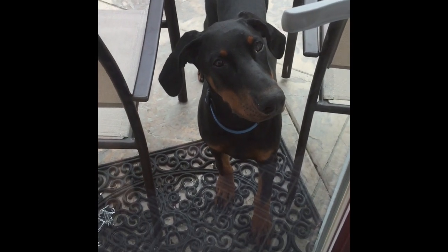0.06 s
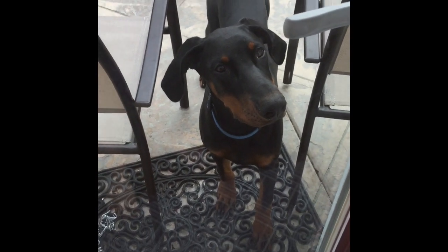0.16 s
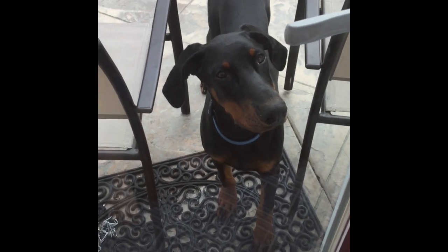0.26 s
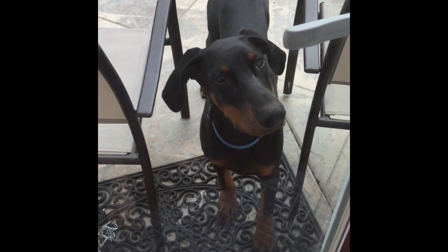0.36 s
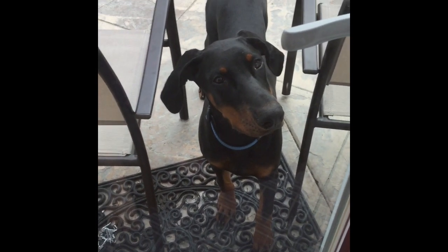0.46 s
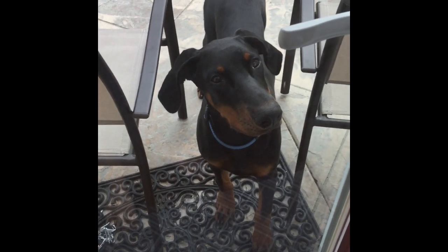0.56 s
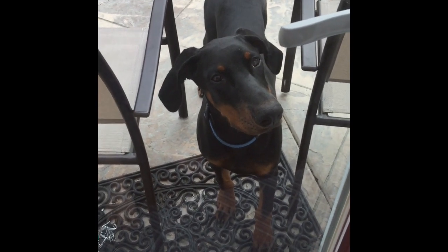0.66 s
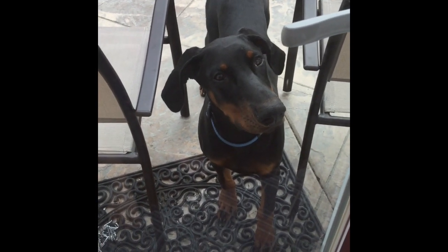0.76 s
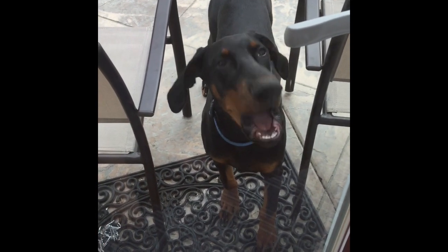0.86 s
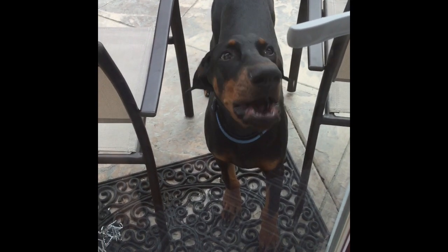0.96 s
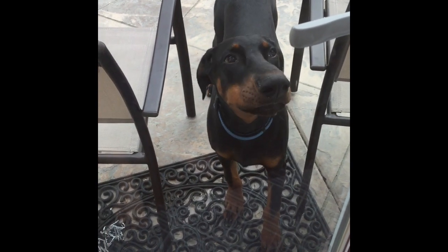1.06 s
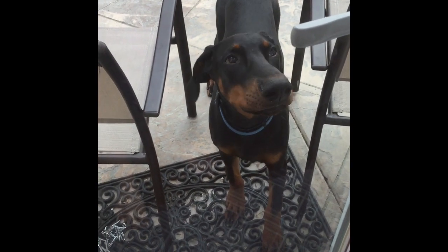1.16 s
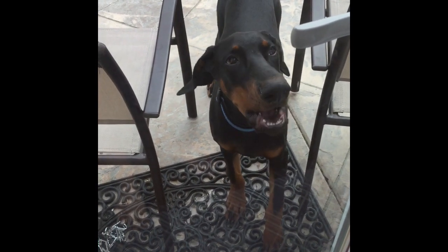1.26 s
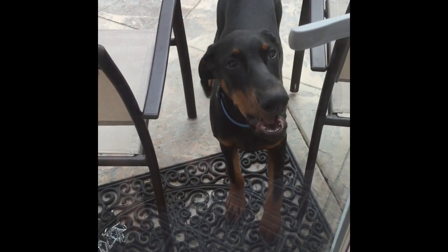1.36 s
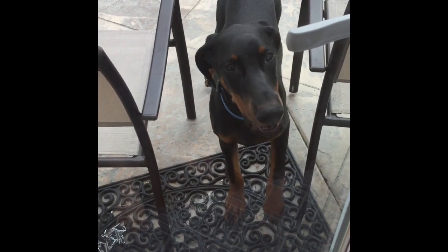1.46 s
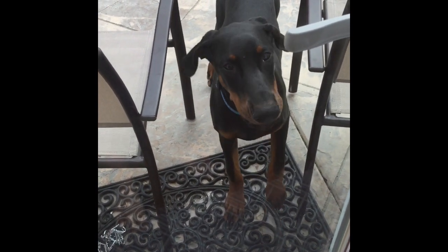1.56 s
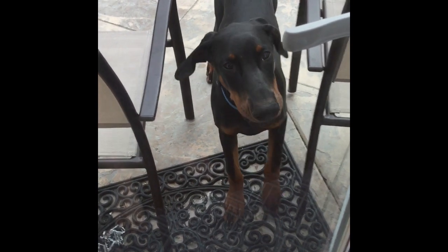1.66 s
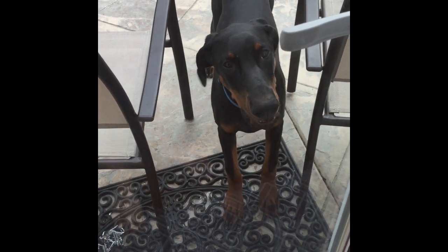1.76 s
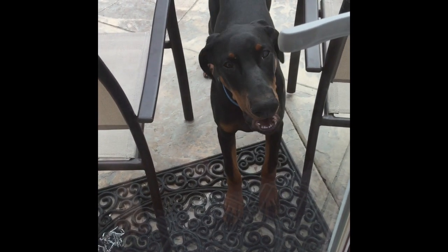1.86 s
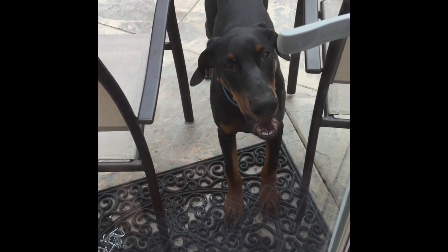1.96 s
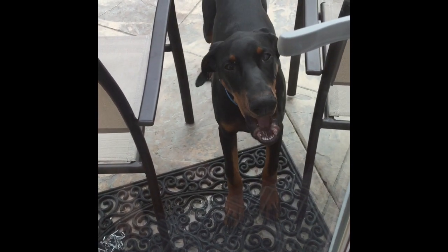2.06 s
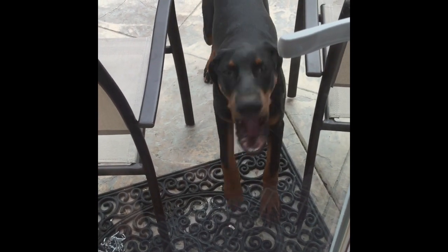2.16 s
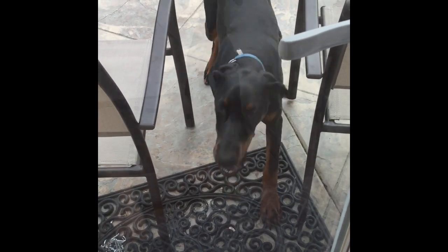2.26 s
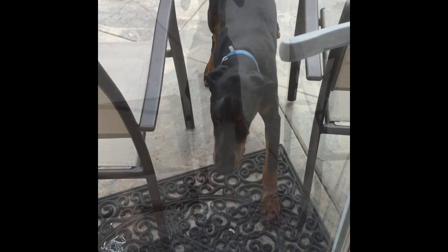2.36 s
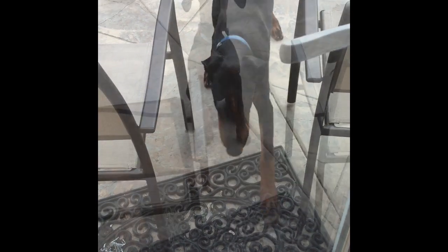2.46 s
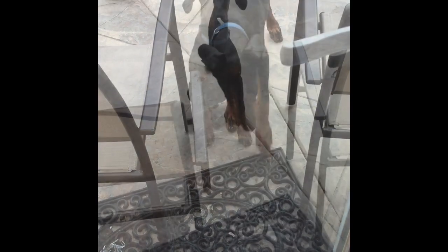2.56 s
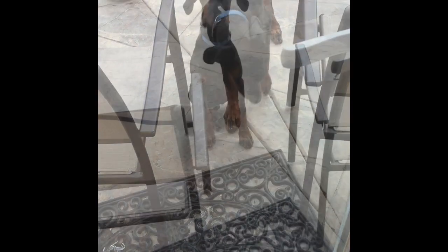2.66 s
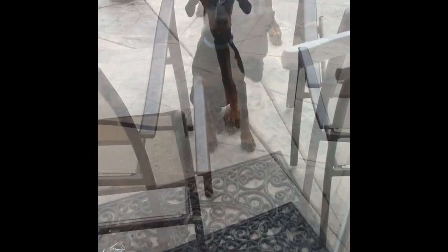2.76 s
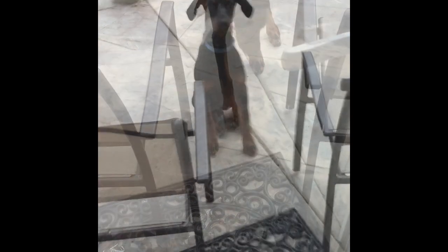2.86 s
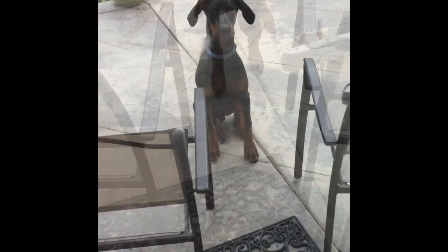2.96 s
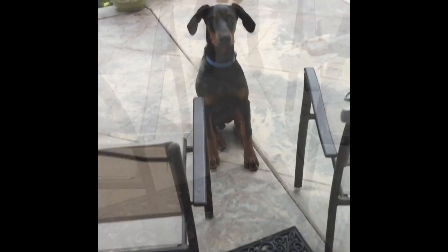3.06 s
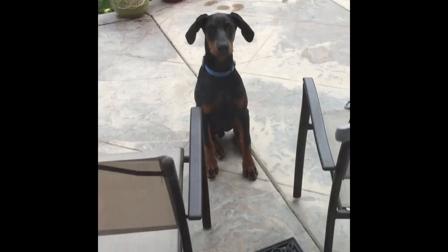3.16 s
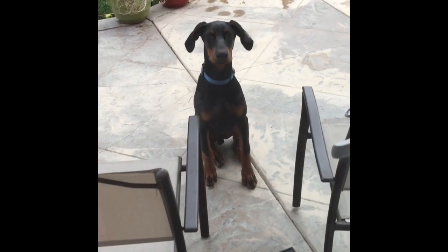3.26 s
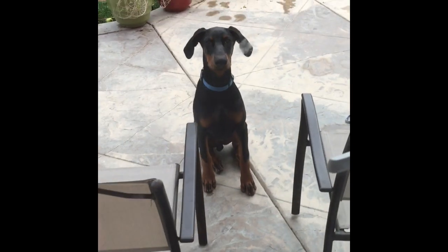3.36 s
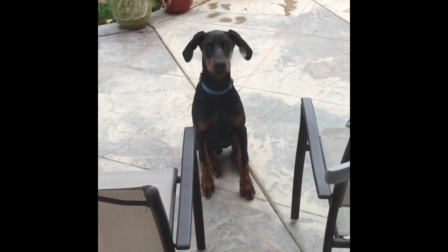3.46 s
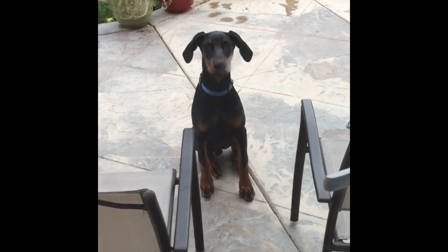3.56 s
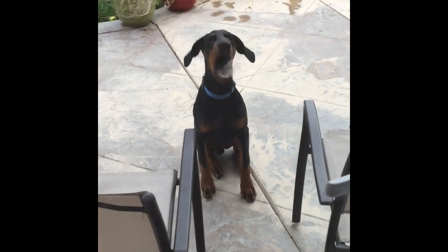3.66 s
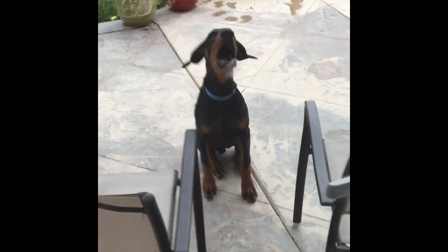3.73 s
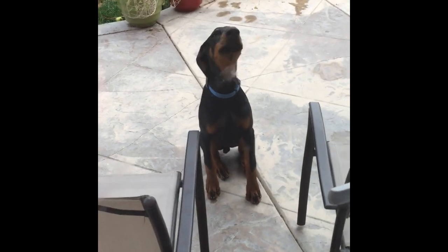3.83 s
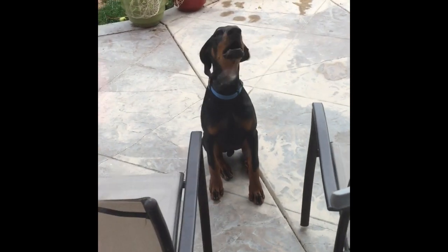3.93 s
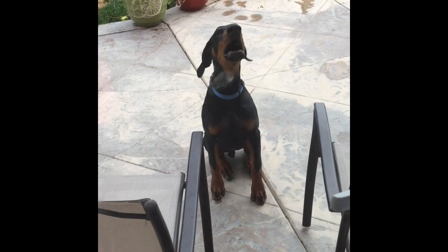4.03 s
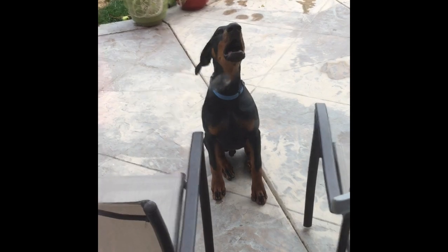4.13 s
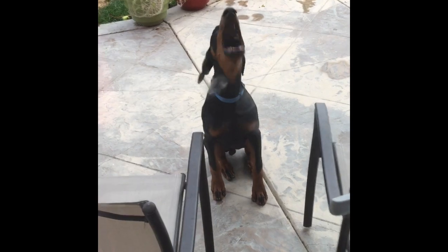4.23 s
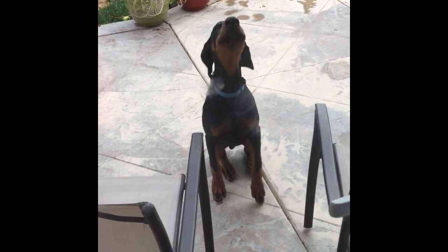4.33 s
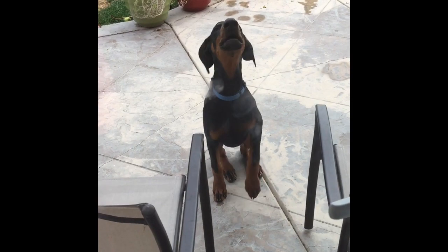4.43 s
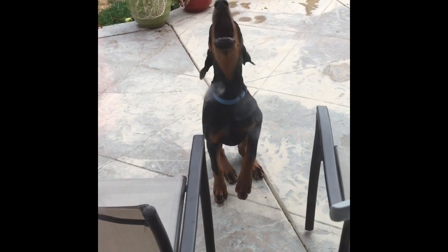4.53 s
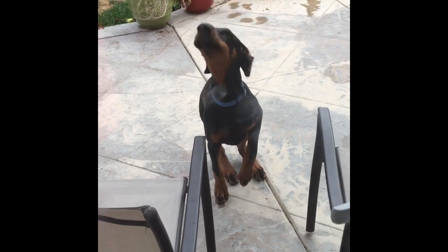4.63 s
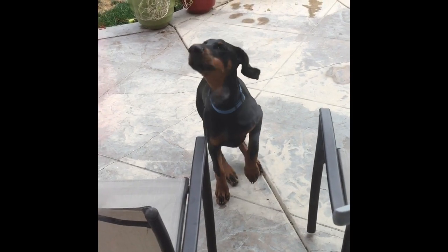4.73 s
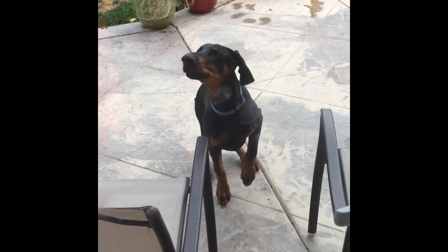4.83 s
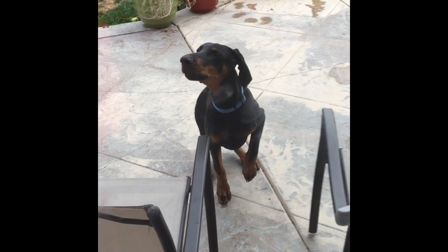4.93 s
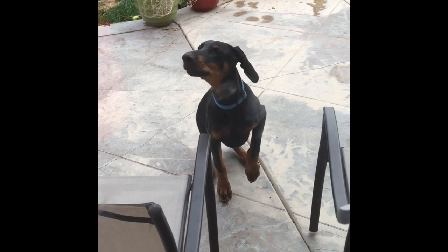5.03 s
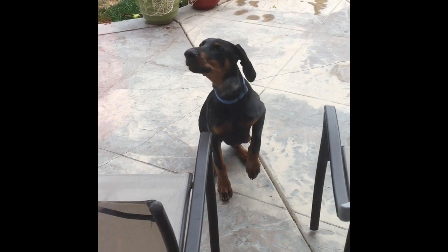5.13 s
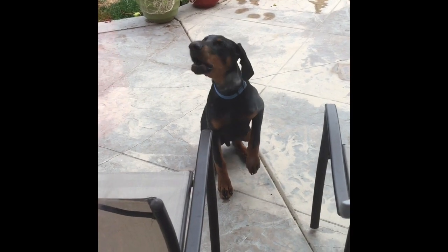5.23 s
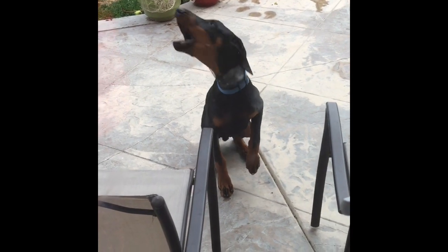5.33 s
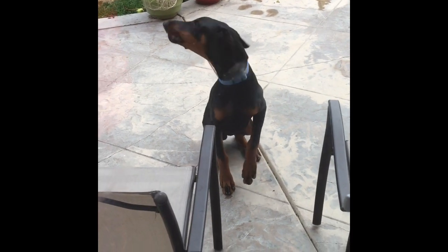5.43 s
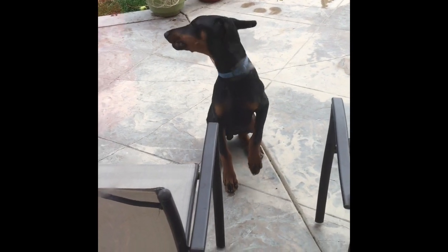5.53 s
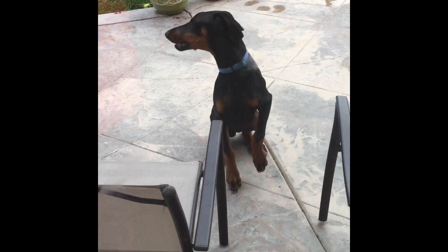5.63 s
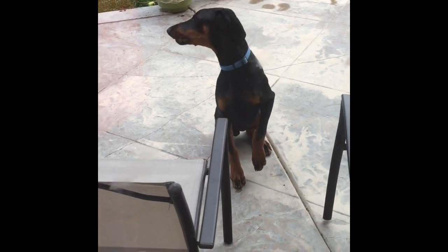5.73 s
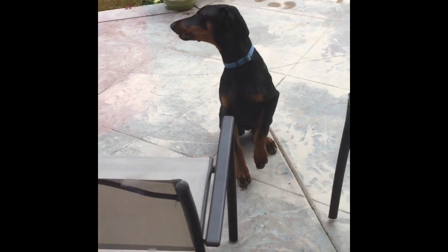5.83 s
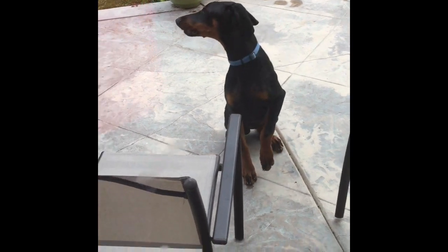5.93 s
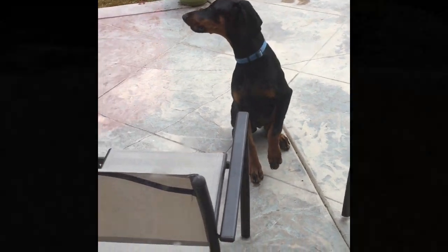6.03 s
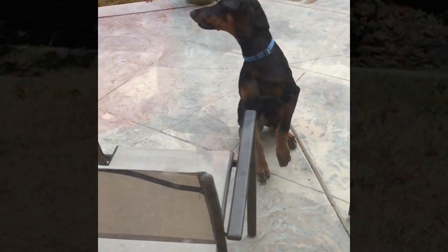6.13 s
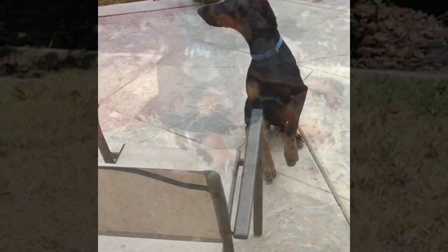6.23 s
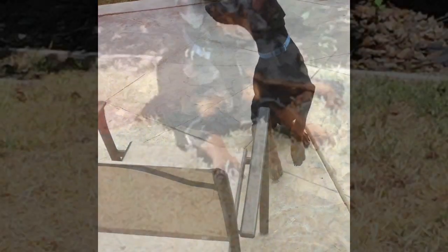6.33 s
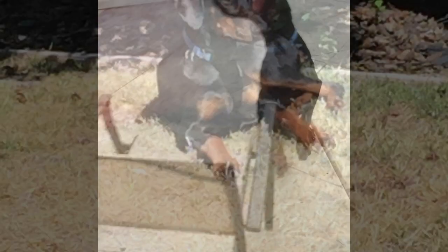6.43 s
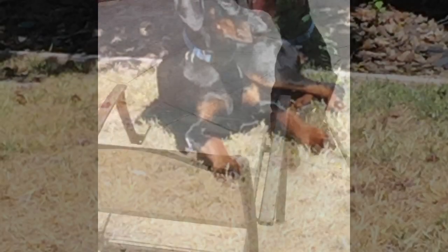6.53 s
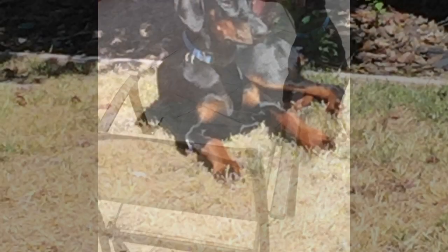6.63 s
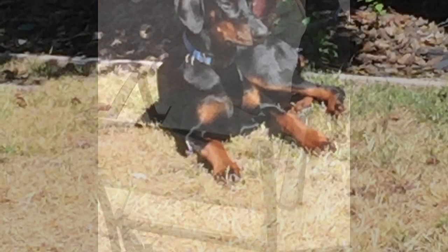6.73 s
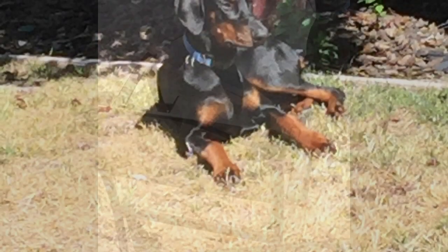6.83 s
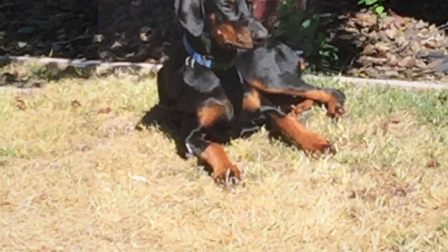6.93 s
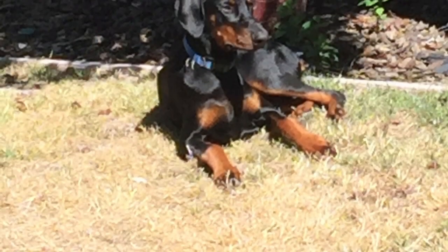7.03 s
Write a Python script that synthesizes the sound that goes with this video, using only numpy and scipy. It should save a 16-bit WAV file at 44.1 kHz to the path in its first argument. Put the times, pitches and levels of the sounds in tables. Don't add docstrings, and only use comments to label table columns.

```python
import sys
import numpy as np
from scipy import signal
from scipy.fft import rfft, irfft, next_fast_len
from scipy.io import wavfile

SR = 44100
rng = np.random.default_rng(int(sys.argv[2]) if len(sys.argv) > 2 else 0)


def attenuation_scalar(level_db):
    decades = np.asarray(level_db, float) / 20
    return 10 ** decades


def log_audio(samples):
    frames = np.atleast_2d(samples).T
    limited = np.clip(frames, -1, 1)
    pcm = np.round(limited * 32767).astype(np.int16)
    wavfile.write(sys.argv[1], SR, pcm)


N = 312699
TIME = np.arange(N) / SR


def rms_one(x):
    return x / np.sqrt(np.mean(x ** 2) + 1e-20)


def columns(rows, t):
    seconds, *rest = np.transpose(rows)
    return [np.interp(t, seconds, column) for column in rest]


def at_hz(points, hz):
    table_hz, values = np.array(points)[:, :2].T
    return np.interp(np.log(hz + 1), np.log(table_hz), values)


def wobble(cut_hz, size):
    low_pass = signal.butter(2, cut_hz, fs=SR, output="sos")
    settled = signal.sosfilt(low_pass, rng.standard_normal(size + 2000))[2000:]
    return rms_one(settled)


def resonate(x, hz, width_hz):
    r = np.exp(-np.pi * width_hz / SR)
    feed = np.array([1, 0, -1]) * (1 - r * r) / 2
    return signal.lfilter(feed, [1, -2 * r * np.cos(2 * np.pi * hz / SR), r * r], x)


def span(rows):
    start = round(rows[0][0] * SR)
    t = np.arange(start, round(rows[-1][0] * SR)) / SR
    fade = np.clip(np.minimum(t - t[0], t[-1] - t) / 0.0015, 0, 1)
    return start, t, fade


def barks():
    # time in seconds, pitch in Hz, level in dB,
    # mouth opening as tilt in dB per octave.
    bark_1 = [
        [(.95, 713, -45, -5.5), (.966, 862.5, -22.5, -13.5), (.982, 811, -19.5, -6.5),
         (1.012, 883.5, -17.5, -1)],
        [(1.012, 1106, -11, -3.5), (1.035, 1075, -17, 0.5), (1.052, 1075, -10, -6), (1.066, 733, -30, -18),
         (1.12, 590, -35.5, -3.5)],
    ]
    bark_2 = [
        [(2.22, 988, -58, -19), (2.231, 986, -20, -17), (2.262, 813, -21, 2.5), (2.277, 836, -18, -5)],
        [(2.275, 1009, -13.5, -4), (2.3, 1035, -6, -11), (2.345, 1044, -19.5, 4.5), (2.37, 657, -25.5, -21.5),
         (2.41, 740, -45, -16.5)],
    ]
    bark_3 = [
        [(3.783, 781, -23.5, -10.5), (3.795, 788.5, -25, 3), (3.815, 824.5, -20, -5), (3.83, 867, -35, -2)],
        [(3.812, 1035, -38, 5), (3.838, 1048, -14, -8.5), (3.86, 1050, -22, 7), (3.882, 957, -20, -1.5),
         (3.9, 926, -45, 4)],
    ]
    bark_4 = [
        [(4.295, 722, -53, 3.5), (4.305, 755.4, -27, -8), (4.325, 669.7, -22, -14), (4.36, 648, -31, -2)],
        [(4.322, 988.4, -22, -14.5), (4.355, 1024, -13.5, -10), (4.385, 1072, -12.5, -6),
         (4.408, 965, -24, -5.5), (4.44, 991.6, -27, -14)],
    ]
    bark_5 = [
        [(4.57, 601.2, -49, -33.5), (4.605, 679, -27, -9.5), (4.628, 727.5, -23.5, -6.5),
         (4.64, 813, -17.5, -4), (4.715, 838, -29.5, -12.5), (4.79, 794.4, -33, -36)],
        [(4.645, 980.6, -28.5, -9), (4.695, 1042, -22.5, -14.5), (4.775, 1028, -34.5, -15.5)],
    ]
    bark_6 = [
        [(5.368, 470.5, -56, -7), (5.385, 527.4, -29.5, -13.5), (5.42, 590.1, -15, -22),
         (5.485, 597.8, -30.5, -7.5)],
        [(5.418, 959, -37, -10.5), (5.445, 941.5, -20.5, -14.5), (5.47, 986.7, -22.5, -2),
         (5.485, 989.3, -19, -11.5), (5.545, 728.6, -41, -11.5)],
    ]
    whimpers = [
        [(.925, 726, -68, -15.5), (.935, 702, -50, -23), (.949, 776, -51, -16.5)],
        [(1.335, 852, -53, -19), (1.36, 910.6, -38.5, -18), (1.395, 928, -50, -15)],
        [(3.748, 878, -49, -14.5), (3.762, 914, -46.5, -24.5), (3.783, 873, -32, -9)],
        [(4.44, 1015, -34, .5), (4.49, 638.4, -42, -30.5), (4.58, 499.3, -42.5, -34.5)],
    ]
    # half-pitch tones in dB at start, middle
    strain = [(-37, -37.5, -41.5, 0.1, .1), (-55, -15, -1.5, .02, .05), (-30, -28, 5, .02, .3),
              (-38, -44, -42, 0.3, 0), (-54, -46.5, -33, 0, 0.12), (-19.5, -11.5, -17.5, 0, 0.41),
              (-62.5, -51, -61, 0.15, 0), (-42, -37, -16, .06, .5), (-24, -31.5, -24, .04, 0.41),
              (-47.5, -12.5, -6, 0, .45), (-26, -1.5, 4, 0.16, 0.27), (6, 18.5, 17, 0.8, 0.51),
              (10.5, -6.5, 12, 0.2, .32), (-3, -2, 8, 0.5, 0.29), (-54.5, -23.5, -9, 0.1, 0.34),
              (-15, -8, 8, .24, .36), ]
    # frequency in Hz, gain in dB.
    throat = [(200, -32), (300, -3), (500, 3), (1000, 11), (1600, 12), (2150, 1.5), (2330, -13),
              (2600, -11.5), (3200, -25), (3500, -35), (3850, -30), (4500, -36), (6300, -34.5),
              (16000, -60)]
    # centre in Hz, width in Hz, gain in dB.
    breath = [(560, 190, -11.5), (1040, 490, -5.5), (1650, 230, 0.5), (2076, 380, -9.5), (2500, 140, -22.5),
              (3020, 300, -27.5), (3850, 350, -28), (4800, 170, -38.5), (6140, 1100, -35), (8600, 740, -47),
              (11600, 890, -45), (14000, 2200, -55.5)]
    voice, hiss = np.zeros(N), np.zeros(N)
    registers = sorted(bark_1 + bark_2 + bark_3 + bark_4 + bark_5 + bark_6 + whimpers)
    k = np.arange(1, 29)[:, None]
    half_weight = (k % 2) * np.where(k == 1, 1.4, np.where(k > 4, 0.7, 1))
    for rows, (*halves_db, fresh, tired) in zip(registers, strain):
        start, t, fade = span(rows)
        hz, level_db, tilt_db = columns(rows, t)
        progress = (t - t[0]) / (t[-1] - t[0])
        half_db = np.interp(progress, [0, 0.5, 1], halves_db)
        rough = np.clip(fresh + (tired - fresh) * progress ** 2, 0, 1)
        slip, shake, air = (wobble(cut_hz, size=12000)[:len(t)] for cut_hz in (110, 200, 15500))
        phase = np.pi * np.cumsum(hz) / SR
        tone_hz = k * hz / 2

        opening_db = tilt_db * np.log2(np.clip(k / 2, 1, 2))
        size = attenuation_scalar(opening_db + half_db * half_weight) * (tone_hz < 15500)
        draws = rng.standard_normal((28, 20))
        flicker = np.array([np.interp(t - t[0], np.arange(20) * 0.022, row) for row in draws])
        size *= attenuation_scalar((tone_hz > 2300) * (0.5 * (level_db + 14.5) + 5.5 * flicker))
        heard = np.sqrt(np.sum((size * attenuation_scalar(at_hz(throat, tone_hz))) ** 2, axis=0) / 2)

        timing_slip = (1.8 * k ** 0.13 * rough + 0.045 * k * (k > 6)) * slip
        tones = np.sum(size * np.sin(k * phase + k * k + timing_slip), axis=0)
        loudness = fade * attenuation_scalar(level_db)
        voice[start:start + len(t)] += loudness * (1 + 1.3 * rough * np.tanh(shake)) * tones / heard
        puffs = air * (1 + 0.34 * np.cos(2 * phase))
        hiss[start:start + len(t)] += loudness * rough ** 1.23 * puffs

    size = next_fast_len(N)
    hz = np.arange(size // 2 + 1) * SR / size
    mouth = sum(attenuation_scalar(db) * np.exp(-((hz - centre) / width) ** 2) for centre, width, db in breath)
    voiced = rfft(voice, size) * attenuation_scalar(at_hz(throat, hz))
    breathed = attenuation_scalar(17.5) * rfft(hiss, size) * mouth
    return irfft(voiced + breathed, size)[:N]


def squeak_rows(s, length, hz, db, second_db):
    shape = ((0, 15.5), (0.17, 0), (1, 9.5))
    return [(s + share * length, hz, db - loss_db, db - loss_db + second_db, -110)
            for share, loss_db in shape]


def whistles():
    # time in seconds, pitch in Hz, level in dB.
    whistle = [
        (1.327, 4720, -70.5),
        (1.383, 4596, -51.5),
        (1.575, 4493, -46.5),
        (1.677, 4430, -48.5),
        (1.767, 4289, -42),
        (1.801, 4320, -53.5),
    ]
    # start in seconds, length in seconds, pitch in Hz,
    # level in dB, second tone against the first in dB.
    squeaks = [(3.3, 0.095, 4556, -67.5, -23.5), (.955, .05, 3850, -62, -13.5),
               (0.976, 0.021, 4870, -53.5, -31), (2.216, 0.038, 3960, -67, 7.5),
               (3.752, .028, 4530, -71.5, -14.5), (3.774, 0.028, 3590, -58.5, -29.5),
               (3.789, 0.023, 3900, -50, -16.5), (4.298, 0.042, 4040, -69, -23.5),
               (5.395, .03, 4080, -69.5, -32.5), (5.415, 0.077, 3800, -57.5, -21)]
    second_db, second_loss_db_per_s, third_db = -14.5, 54.5, -34.5
    out = np.zeros(N)
    speaks_s = whistle[1][0]
    long = [(s, hz, db, db + second_db - second_loss_db_per_s * (s - speaks_s), db + third_db)
            for s, hz, db in whistle]
    for rows in [long] + [squeak_rows(*row) for row in squeaks]:
        start, t, fade = span(rows)
        hz, *levels_db = columns(rows, t)
        phase = 2 * np.pi * np.cumsum(hz) / SR + 0.15 * wobble(80, size=30000)[:len(t)]
        tones = sum(attenuation_scalar(db) * np.sin((k + 1) * phase) for k, db in enumerate(levels_db))
        tremble = attenuation_scalar(0.44 * wobble(40, size=30000)[:len(t)])
        out[start:start + len(t)] += np.sqrt(2) * fade * tones * tremble
    return out


def ticks():
    # time in seconds, thud level in dB, thud pitch in Hz, ring level in dB, ring pitch in Hz.
    paws = [(.234, -42.5, 470, -54, 856), (.26, -52, 480, -58, 900), (.497, -40.5, 470, -52, 1100),
            (0.555, -39, 405, -60, 1230), (.706, -32, 400, -45, 1310), (2.959, -41.5, 470, -46, 663),
            (5.03, -34, 500, -60, 896.6), (5.161, -70, 693.5, -48.5, 3340)]
    claws = [(1.7184, -36.5, 610, -33.5, 1876), (1.954, -67, 683, -59, 4290),
             (3.658, -62, 670.5, -59.5, 1650), (3.74, -27.5, 487, -41.5, 1380),
             (4.226, -34.5, 460, -47, 3080), (4.289, -35.5, 403.4, -52, 2500),
             (6.527, -59, 691, -52.5, 1296)]
    paw_crack_db, claw_crack_db = -23, -1.5
    out, t = np.zeros(N), np.arange(1500) / SR
    dull = signal.butter(2, [2500, 8000], "band", fs=SR, output="sos")
    contacts = sorted([(*row, paw_crack_db) for row in paws] + [(*row, claw_crack_db) for row in claws])
    for s, thud_db, thud_hz, ring_db, ring_hz, crack_db in contacts:
        thud = np.sin(2 * np.pi * thud_hz * t) * np.exp(-t / 0.0021) * (1 - np.exp(-t / 0.00064))
        ring = np.sin(2 * np.pi * ring_hz * t) * np.exp(-t / 0.0016)
        crack = 1.5 * signal.sosfilt(dull, rng.standard_normal(1500)) * np.exp(-t / 0.0009)
        at = round(s * SR)
        out[at:at + 1500] += attenuation_scalar(thud_db) * thud + attenuation_scalar(ring_db) * ring + attenuation_scalar(ring_db + crack_db) * crack
    return out


def patio(x):
    # delay in seconds, level in dB.
    echoes = [(.0045, -14), (0.012, -19.5), (.019, -9), (.031, -22.5), (.047, -14.5)]
    # from in seconds,
    # ring against direct sound in dB, length of the ring with 1 as usual.
    facing = [
        (0.0, -5, .95),
        (1.25, -3.5, 0.81),
        (2.1, -6.5, 0.9),
        (2.9, -6.5, 1.13),
        (4.28, -8, 1.01),
        (4.55, -6.5, 1.13),
        (5.3, -2, 0.94),
    ]
    # frequency in Hz, time to fall 60 dB in seconds.
    patio_t60 = [(250, 1), (600, 0.77), (1000, 0.93), (2500, 1.02), (3300, 0.88), (3900, .38), (5500, 0.41),
                 (9000, 0.22), (16000, 0.18)]
    # delay in seconds, smear in seconds, level over the ring in dB.
    far_walls = [(0.271, .025, 1), (.45, 0.08, 1)]
    t, edges = np.arange(SR) / SR, 170 * 2 ** np.arange(0, 6.6, 0.5)
    out = x + sum(attenuation_scalar(db) * np.roll(x, round(lag * SR)) for lag, db in echoes)
    starts = [round(row[0] * SR) for row in facing] + [N]
    for (_, ring_db, length), first, last in zip(facing, starts, starts[1:]):
        tail, white = 0, rng.standard_normal((2, SR))
        for k, (low, high) in enumerate(zip(edges, edges[1:])):
            band_pass = signal.butter(2, [low, high], "band", fs=SR, output="sos")
            band = signal.sosfilt(band_pass, white[k % 2])
            t60 = length * at_hz(patio_t60, np.sqrt(low * high))
            tail = tail + band * attenuation_scalar(-60 * t / t60)
        tail *= attenuation_scalar(ring_db) * (1 - np.exp(-t / 0.0088)) / np.sqrt(SR * 0.06)
        tail *= attenuation_scalar(sum(db * np.exp(-((t - lag) / smear) ** 2) for lag, smear, db in far_walls))
        tail *= attenuation_scalar(-9 * (np.maximum(t - 0.47, 0) * 5) ** 2)
        out[first:last + SR - 1] += signal.fftconvolve(x[first:last], tail)[:N - first]
    return out


def surroundings():
    # frequency in Hz, level in dB per Hz.
    air_colour = [(140, -30.5), (240, 1.5), (405, -6.5), (638, -5.5), (1060, -10), (1910, -11.5),
                  (3650, -15.5), (4910, -17.5), (8890, -20.5), (10400, -24.5), (15500, -22.5)]
    # time in seconds, load in dB.
    load = [(0, -0.7), (.61, -3.5), (1.42, 3.5), (1.56, -2), (1.74, 4.5), (2.51, -1.5), (3.28, -3.5),
            (4.6, 1.5), (6.0, -0.9), (7.09, 1.5)]
    # time in seconds, peak in dB, length in seconds.
    gusts = [(0.094, -63, 0.035), (0.244, -68, 0.029), (1.342, -65, .04), (1.465, -67, 0.061),
             (1.774, -58.5, 0.036), (2.28, -64, 0.052), (2.678, -70.5, 0.03), (2.976, -59, 0.014),
             (3.12, -71, 0.026), (3.491, -51.5, 0.045), (3.773, -65, 0.081), (4.26, -54, .06),
             (4.815, -49, 0.036), (4.88, -61, 0.032), (5.045, -79, 0.085), (5.373, -47, 0.021),
             (5.451, -54, .05), (5.811, -67, 0.026), (6.037, -44, .03), (6.169, -53.5, 0.047),
             (6.357, -68.5, 0.045), (6.544, -62, .02)]
    load_db, = columns(load, TIME)
    calm = attenuation_scalar(-74)
    wind = calm + sum(attenuation_scalar(db) * np.exp(-((TIME - s) / length) ** 2) for s, db, length in gusts)
    size = next_fast_len(N)
    colour = attenuation_scalar(at_hz(air_colour, np.arange(size // 2 + 1) * SR / size))
    air = rms_one(irfft(rfft(rng.standard_normal(size)) * colour, size)[:N])
    white = rng.standard_normal((4, N))
    low_hum = rms_one(resonate(resonate(white[0], 120, 46), 120, 33))
    wide_hum = rms_one(resonate(resonate(white[1], 130, 64), 130, 64))
    hum = low_hum + 0.36 * wide_hum
    rumble_band = signal.butter(2, [140, 225], "band", fs=SR, output="sos")
    rumble = rms_one(signal.sosfilt(rumble_band, white[2]))
    lumps = rms_one(resonate(resonate(white[3], 57, 26), 47, 68))
    machine = hum * attenuation_scalar(-60 + load_db) + rumble * attenuation_scalar(-76 + 3.9 * load_db)
    return air * attenuation_scalar(-69.5) + machine + lumps * wind


def scene():
    fade_from_s, fade_to_s = 6.11, 7.054
    fade = np.clip((fade_to_s - TIME) / (fade_to_s - fade_from_s), 0, 1)
    dog = patio(barks() + whistles()) + ticks()
    return (fade * (dog + surroundings()))[None, :]


def roll_off(x):
    return signal.sosfilt(signal.butter(12, 15690, fs=SR, output="sos"), x)


def record(dry):
    bass_cut = signal.butter(2, 32, "high", fs=SR, output="sos")
    top_cut = signal.cheby2(12, 60, 16200, fs=SR, output="sos")
    mix = signal.sosfilt(top_cut, signal.sosfilt(bass_cut, dry))
    return roll_off(mix)


dry = scene()
out = record(dry)
log_audio(out)
```